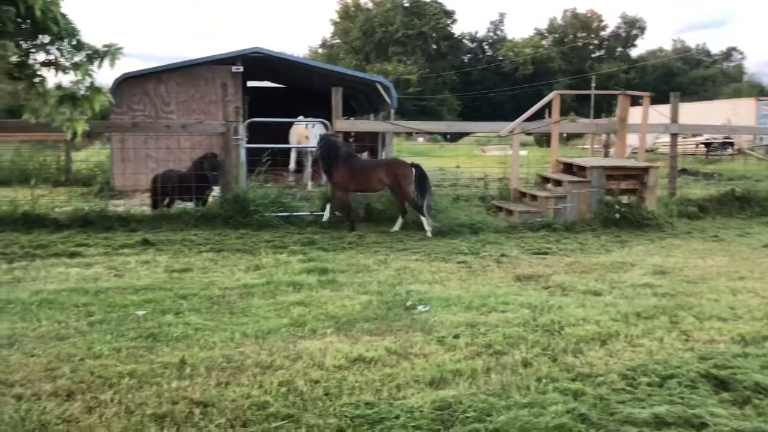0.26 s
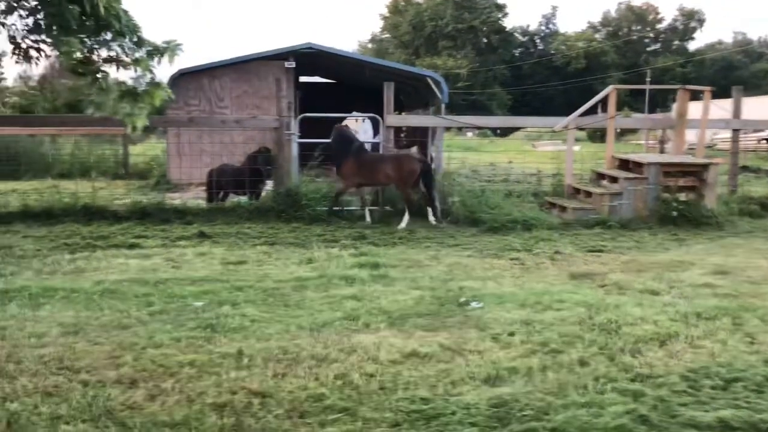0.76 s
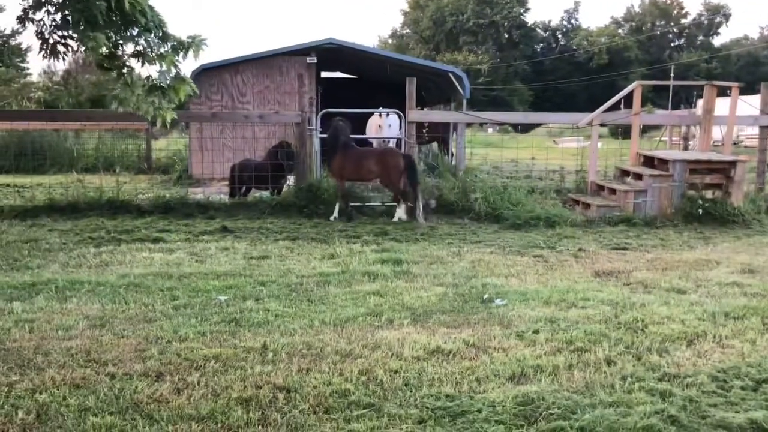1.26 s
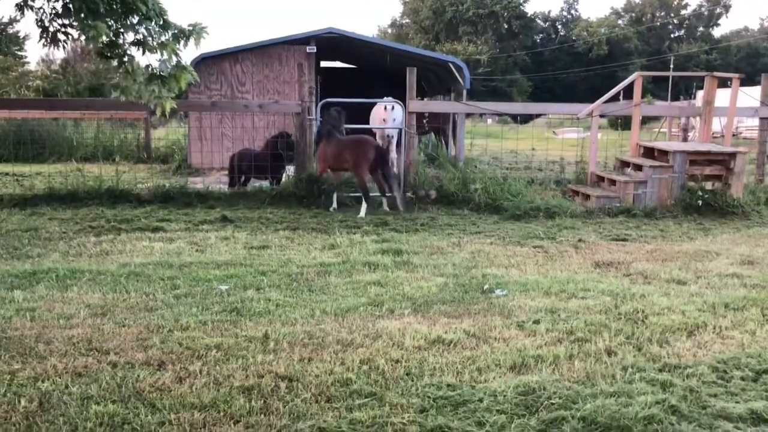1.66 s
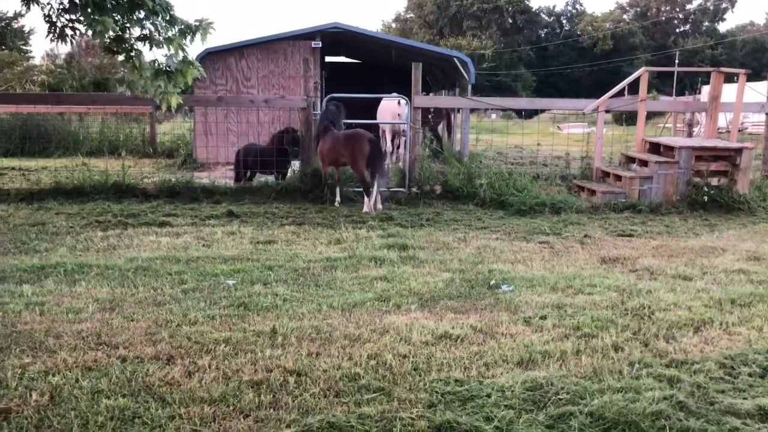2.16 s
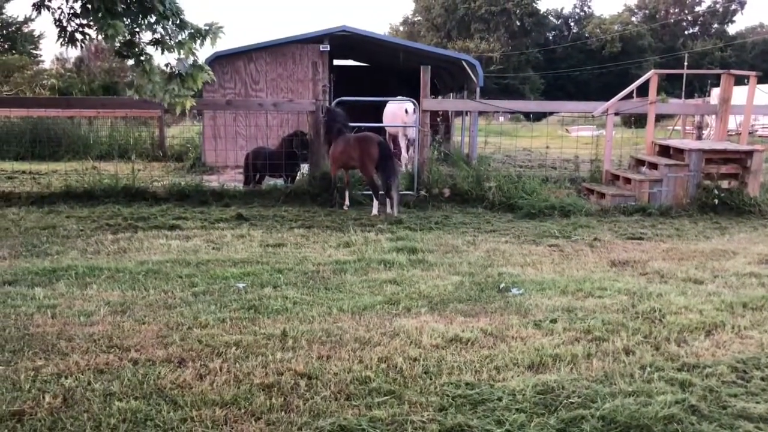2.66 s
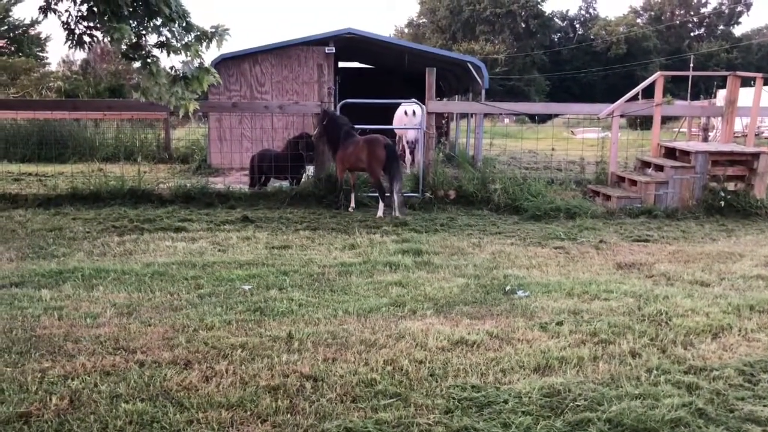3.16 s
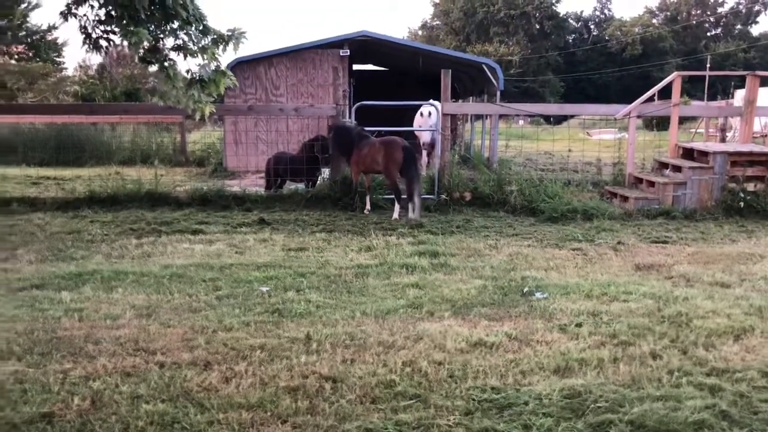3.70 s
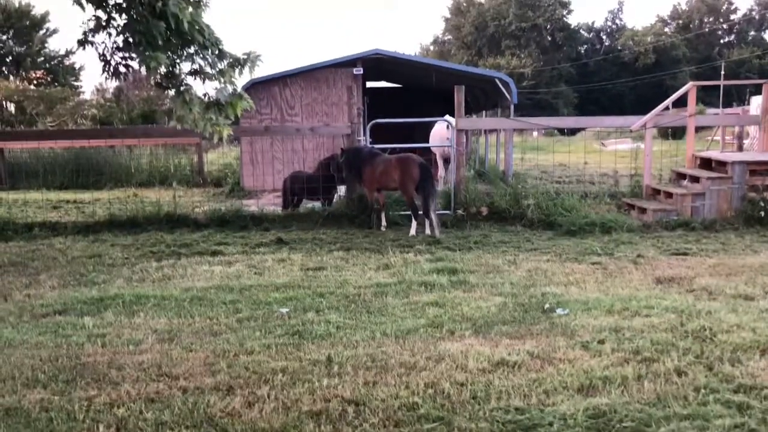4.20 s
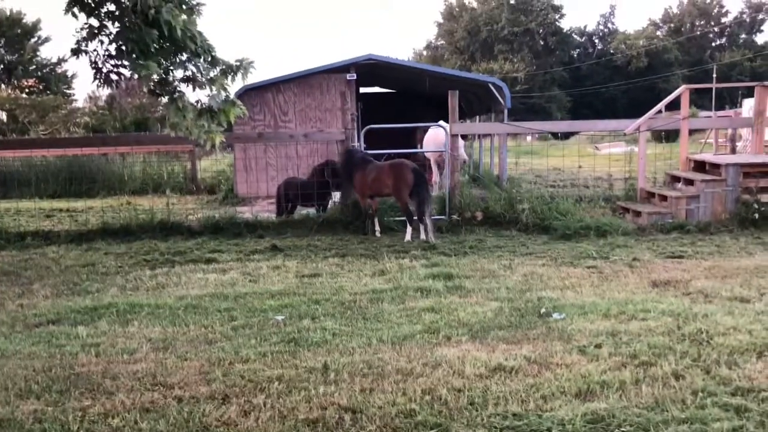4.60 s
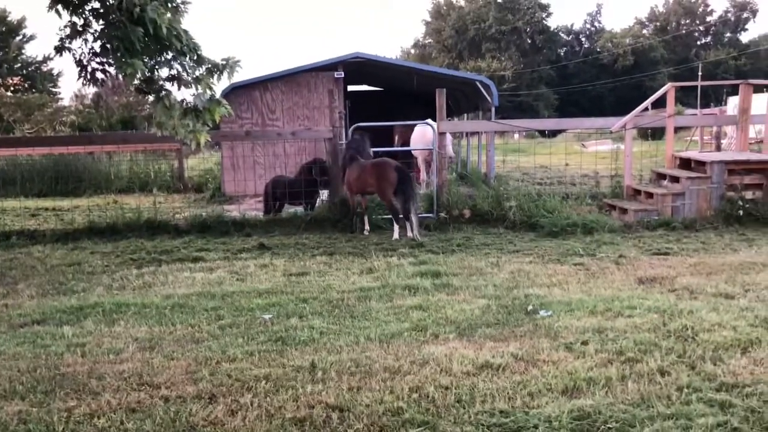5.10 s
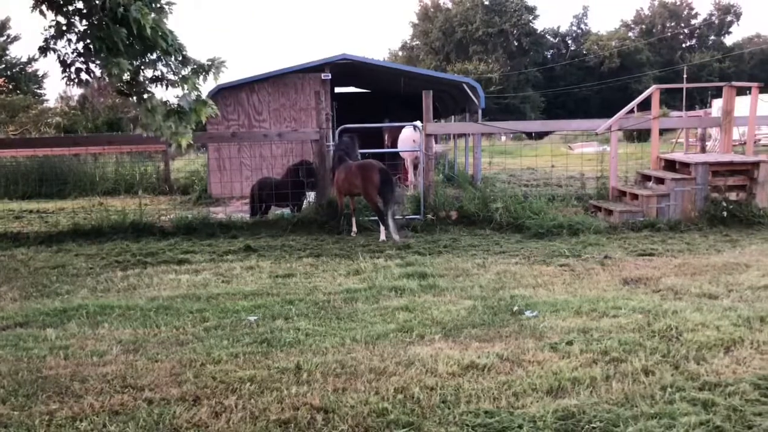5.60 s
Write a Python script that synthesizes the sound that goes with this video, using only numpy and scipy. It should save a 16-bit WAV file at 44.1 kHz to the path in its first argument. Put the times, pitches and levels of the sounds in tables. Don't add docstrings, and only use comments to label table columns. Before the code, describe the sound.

Open field insects, captured on a handheld phone in mono: high pure chirps in quick five-pulse bursts, blended with a swelling far chorus, airy rasping and a cicada wash. A faint road hums and one car passes far off. Knocks on the phone case come in the first seconds, then a single dull, hollow kick on shed boards with a short low ring, then a few small late taps.

```python
import sys
import numpy as np
from scipy import signal
from scipy.fft import rfft, irfft, next_fast_len
from scipy.io import wavfile
from scipy.ndimage import uniform_filter1d, map_coordinates

SR = 44100
rng = np.random.default_rng(int(sys.argv[2]) if len(sys.argv) > 2 else 0)


def decibels_to_gain(level_db):
    exponent = np.asarray(level_db, float) / 20
    return 10 ** exponent


def bounce(signal):
    frames = np.transpose(np.atleast_2d(signal))
    limited = np.clip(frames, -1, 1)
    pcm = np.round(limited * 32767).astype(np.int16)
    wavfile.write(sys.argv[1], SR, pcm)


N = 257984
T = np.arange(N) / SR

# time_s, strokes_count
WING_STROKES = [(0, -.3), (.3, 11.1), (.5, 19.16), (1, 40.26), (2, 81.51), (2.75, 112.01), (4.25, 172.27),
                (4.5, 181.97), (5, 202.8), (5.25, 213.09), (5.5, 222.59), (5.9, 238.6)]
# time_s, level_db
SINGING_EFFORT = [(0, -64), (.1, -58), (.2, -63), (.38, -72), (.55, -67), (.8, -60.5), (1.3, -60),
                  (2.1, -61.5), (2.7, -58.5), (3.3, -60), (4.05, -63.5), (4.58, -58.5), (4.62, -66),
                  (5.25, -62.5), (5.34, -66), (5.85, -63)]
# freq_hz, density_db
WING_COLOUR = [(9000, -45), (11700, -14), (12150, -7), (12500, -11), (13600, -10), (14300, -2), (14700, -6),
               (15300, -2), (15700, 1), (15900, -55)]
# freq_hz, density_db
GRASS_COLOUR = [(6000, -51), (7000, -2), (7400, -0.5), (7800, -2.5), (9000, -2), (11000, -3), (13000, -6.5),
                (14000, -2), (15000, 0), (15750, -5), (15900, -60)]
# freq_hz, density_db
SIZZLE_COLOUR = [(11000, -44), (13000, -8), (14200, -1), (15200, 1), (15750, -7), (15900, -60)]
# freq_hz, density_db
CICADA_COLOUR = [(1300, -32.5), (1750, -17), (2230, -6), (2500, -9.5), (2750, -3), (2990, 0.2), (3250, -3),
                 (4100, -5), (4300, -6), (5050, -2), (5900, -6), (6300, -5.5), (7000, -8), (7600, -50)]
# time_s, level_db
CICADA_SWELL = [
    (0, -52.5),
    (1.9, -52),
    (2.5, -51),
    (5.85, -52),
]
# freq_hz, density_db
RUMBLE_COLOUR = [(15, -49), (25, -35), (30, -53), (43, -7), (102, 0.5), (128, -2), (176, -5), (198, -10),
                 (223, -10), (320, -27), (420, -47), (700, -120)]
MURMUR_COLOUR = [(150, -48), (260, -3), (538, -2), (644, -4), (725, -3.5), (1000, -5.5), (1300, -8.5),
                 (2200, -120)]
TYRE_COLOUR = [(530, -10), (900, -27), (962, -11), (1130, 2), (1300, 3), (1580, 4.5), (1750, -2),
               (1850, -13), (2400, -34), (4070, -120)]
# middle_s, level_db
CHIRPS = [(.069, -42), (0.369, -42), (0.672, -42.5), (.975, -42.5), (1.28, -41), (1.588, -43), (1.918, -41),
          (2.218, -39), (2.513, -41.5), (2.816, -41.5), (3.112, -43), (3.409, -43), (3.698, -39.5),
          (4.038, -41), (4.335, -41.5), (4.649, -40.5), (4.963, -40.5), (5.254, -49), (5.54, -40),
          (5.838, -41)]
CHIRP_PULSES = [6] + [5] * 19
# middle_s, top_level_db
CHORUS_SWELLS = [(.09, -48.5), (.394, -46.5), (.708, -48.5), (.998, -46.5), (1.299, -47.5), (1.6, -46.5),
                 (1.908, -47), (2.211, -48.5), (2.503, -47), (2.813, -47.5), (3.118, -45), (3.423, -47.5),
                 (3.728, -46), (4.024, -47), (4.311, -46), (4.618, -46), (4.935, -46.5), (5.235, -49),
                 (5.532, -46.5), (5.84, -47.5)]
# freq_hz, density_db
SCRAPE_COLOUR = [(6000, -26), (6350, -26), (7100, 0), (7450, -5.5), (7800, -22)]
# start_s, case_db, bright_crack_db
TAPS = [(.139, -46, -36), (0.572, -28.5, -37), (.588, -43, -33), (1.094, -40, -60), (1.187, -32, -31),
        (1.2195, -33, -47), (1.223, -38, -45), (1.235, -39, -46), (2.037, -41, -45), (5.1118, -36, -52),
        (5.286, -33.5, -33), (5.297, -37, -45), (5.4628, -39, -49), (5.6442, -45, -51), (5.8187, -43, -47)]
# centre_hz, width_hz, level_db
CASE_MODES = [(950, 190, 2), (2000, 360, 3.5), (3150, 1200, -4), (4430, 1000, -1.5), (6900, 1800, -3)]
# middle_s, pitch_hz, level_db
TRILLS = [(.38, 4100, -68), (.65, 4090, -61), (0.641, 4489, -67), (1.531, 4112, -64), (1.53, 4460, -63),
          (2.21, 4059, -63), (2.38, 4470, -70), (2.68, 3930, -61), (3.08, 4059, -65), (3.29, 4521, -68),
          (3.56, 3970, -61), (4.32, 4380, -63), (4.4, 3983, -67), (4.9, 4069, -67), (5.13, 4198, -64),
          (5.47, 4000, -66), (5.74, 4489, -64)]
# start_s, peak_db, first_hz, last_hz, t60_s
THUMPS = [
    (0.4827, -40.5, 350, 200, 0.014),
    (0.574, -27.5, 326, 89, 0.027),
    (0.59, -35, 294, 150, 0.027),
    (1.189, -26.5, 340, 102, 0.033),
    (3.397, -23, 323, 133, 0.049),
    (3.412, -30, 414, 250, 0.033),
    (3.451, -37, 200, 120, 0.037),
    (5.2893, -29.5, 564, 70, 0.0088),
]
# start_s, length_s, peak_db, first_hz, last_hz
SQUEAKS = [
    (0.53, 0.023, -44.5, 393, 624),
    (1.127, 0.019, -54.5, 624, 614),
    (1.144, 0.0256, -49, 354, 676),
]
# start_s, level_db, pitch_hz, t60_s
RINGS = [(0.572, -34.5, 3800, 0.0068), (0.5734, -37, 950, 0.0062), (.573, -44, 1950, .007),
         (0.5767, -40, 2820, 0.0087), (0.58, -45, 2620, .012), (1.094, -48.5, 2000, .02),
         (1.187, -32.5, 990, 0.0093), (1.187, -41, 2290, 0.0087), (1.221, -46, 780, 0.018),
         (1.186, -41, 3400, 0.011), (1.188, -44, 4500, .008), (1.396, -52, 570, 0.045),
         (5.1123, -46.5, 1830, 0.027), (5.288, -49, 840, 0.0091), (5.4623, -45, 2330, .011),
         (5.6435, -42.5, 2400, 0.013), (5.8193, -41, 2150, .016)]
# pitch_hz, level_db, t60_s
WALL_MODES = [(110.8, -36.5, 0.88), (197, -44, 0.77), (292.5, -48, 0.35)]
# from_hz, to_hz, under_db
MASKED_BANDS = [(7240, 7580, -28), (7580, 7920, -27), (7920, 8270, -27.3), (8270, 8610, -30.5),
                (8610, 8960, -32)]


def unit(x):
    return x / np.sqrt(np.mean(x ** 2) + 1e-20)


def curves(rows):
    s, *cols = np.transpose(rows)
    return [np.interp(T, s, c) for c in cols]


def wobble(rate, size=1):
    coarse = T[::64]
    knots = rng.standard_normal((size, int(N * rate / SR) + 4))
    return np.squeeze([np.interp(T, coarse, map_coordinates(row, [coarse * rate])) for row in knots])


def rush(spectrum, patchy_db, size=N):
    z = signal.stft(rng.standard_normal(size + 512), SR, nperseg=512)[2]
    field = uniform_filter1d(rng.standard_normal(z.shape), 5, 0)
    field = uniform_filter1d(field, 10, 1)
    x = signal.istft(z * decibels_to_gain(patchy_db * unit(field)), nperseg=512)[1]
    f, db = np.transpose(spectrum)
    m = next_fast_len(len(x))
    hz = np.fft.rfftfreq(m, 1 / SR)
    colour = decibels_to_gain(np.interp(np.log(hz + 1), np.log(f + 1), db))
    return unit(irfft(rfft(x, m) * colour, m)[:size])


def tone(hz):
    return np.sin(2 * np.pi * np.cumsum(hz) / SR)


def add(out, s, sound):
    part = out[max(round(s * SR), 0):][:len(sound)]
    part += sound[:len(part)]


def field_echo(x, t60, wet_db):
    t = np.arange(SR // 3) / SR
    tail = rng.standard_normal(len(t)) * decibels_to_gain(-60 * t / t60) * np.clip(t / 0.0048, 0, 1)
    return x + decibels_to_gain(wet_db) * signal.fftconvolve(x, tail / np.linalg.norm(tail))[:N]


def shimmer(x, depth_db):
    z = signal.stft(x, nperseg=4096)[2]
    patches = uniform_filter1d(rng.standard_normal(z.shape), size=4, axis=1)
    field = decibels_to_gain(depth_db * unit(patches))
    return signal.istft(z * unit(field), nperseg=4096)[1][:N]


def bush_crickets():
    join_s, tire_s, leave_s = 2.02, 3.7, 4.6
    second_db, tire_db = -61, -15
    hiss_db, hiss_follows = -63, 0.53
    in_step_share, blur = 0.61, 0.33
    sizzle_db = -60

    rasp_db, = curves(SINGING_EFFORT)
    duet = np.clip((T - join_s) / (leave_s - join_s), 0, 1)
    tired = np.clip((T - tire_s) / (leave_s - tire_s), 0, 1)
    second = (duet > 0) * (duet < 1) * decibels_to_gain(second_db + tire_db * tired)
    first = decibels_to_gain(hiss_db + hiss_follows * (rasp_db - np.median(rasp_db)))
    hiss = np.hypot(first, second)

    in_step = in_step_share - blur * np.sin(np.pi * duet) ** 2
    strokes, = curves(WING_STROKES)
    throb = ((1 + np.cos(2 * np.pi * strokes)) / 2) ** 0.8
    throb = 1 + np.clip(in_step, 0, 1) * (throb / throb.mean() - 1)
    rasp = decibels_to_gain(rasp_db) * unit(throb * rush(WING_COLOUR, patchy_db=1.1))
    sizzle = decibels_to_gain(sizzle_db) * np.sin(np.pi * duet ** 1.3) ** 0.8 * rush(SIZZLE_COLOUR, patchy_db=0.0)
    return sizzle + rasp + hiss * unit(throb + 5.5) * rush(GRASS_COLOUR, patchy_db=1.5)


def far_cicadas():
    swell_db, = curves(CICADA_SWELL)
    return decibels_to_gain(swell_db + 0.31 * wobble(8.6)) * rush(CICADA_COLOUR, patchy_db=0.74)


def far_road():
    pass_s, pass_db, half_power_s = 3.24, -60, 0.65
    traffic_db, rumble_db, murmur_db = -71.5, -56, -65
    car = decibels_to_gain(pass_db) / np.hypot(1, (T - pass_s) / half_power_s)
    tyres = np.hypot(car, decibels_to_gain(traffic_db))
    rumble = decibels_to_gain(rumble_db + 0.57 * wobble(2.9)) * rush(RUMBLE_COLOUR, patchy_db=0.5)
    murmur = np.hypot(decibels_to_gain(murmur_db), 0.5 * tyres) * rush(MURMUR_COLOUR, patchy_db=0.96)
    return rumble + murmur + tyres * rush(TYRE_COLOUR, patchy_db=1.5)


def near_cricket():
    pitch_hz, sag_hz, gap_s, length_s = 6950, 60, 0.0275, 0.017
    out = np.zeros(N)
    u = np.arange(round(length_s * SR)) / (length_s * SR)
    shape = np.sin(np.pi * u ** 1.05) ** 0.9
    for (s, db), count in zip(CHIRPS, CHIRP_PULSES):
        for k, (size, tune, late) in enumerate(rng.standard_normal((count, 3))):
            stroke = tone(pitch_hz + 10 * tune - sag_hz * u)
            start = s + (k - (count - 1) / 2) * gap_s - length_s / 2
            start += 0.00073 * late + 0.0026 * (k == 0)
            add(out, start, decibels_to_gain(db - 4.5 + 1.8 * size) * shape * stroke)
    return field_echo(out, t60=0.14, wet_db=-7)


def cricket_chorus():
    count, rest_db = 15, -66
    rise_s, fall_s, squareness = 0.12, 0.12, 2.15
    levels = []
    for s, db in CHORUS_SWELLS:
        away = np.where(T < s, (s - T) / rise_s, (T - s) / fall_s)
        levels.append(db - 12 * away ** squareness)
    level_db = np.max(levels, axis=0)

    group_hz = 6640 + 90 * wobble(8.2)
    out = np.zeros(N)
    for k, (shift, pace, start) in enumerate(rng.random((count, 3))):
        drift, size = wobble(5, size=2)
        hz = 6490 + 350 * (k + shift) / count + 35 * drift
        stroke_hz = 34 + 4 * pace
        strokes = np.clip(np.sin(2 * np.pi * (stroke_hz * T + start)) + 0.21, 0, 1)
        nearness = decibels_to_gain(2.6 * size - 3.5 * np.abs(hz - group_hz) / 150)
        out += nearness * strokes * tone(hz + 30 * wobble(60))
    out = field_echo(out, t60=0.15, wet_db=-4)
    even = out / np.sqrt(np.abs(uniform_filter1d(out ** 2, SR // 12)) + 1e-9)
    scrape = decibels_to_gain(level_db - 17.0) * rush(SCRAPE_COLOUR, patchy_db=4.5)
    return even * np.hypot(decibels_to_gain(level_db), decibels_to_gain(rest_db)) + scrape


def case_taps():
    out, jolts, t = np.zeros(N), np.zeros(N), np.arange(SR // 8) / SR
    envelope = decibels_to_gain(-60 * t / 0.012) * (1 - np.exp(-t / 0.0019))
    for s, case_db, crack_db in TAPS:
        grit = rng.standard_normal((2, len(t))) * envelope
        add(out, s, decibels_to_gain(crack_db - 1.0) * np.gradient(grit[0]))
        add(jolts, s, decibels_to_gain(case_db + 9.0) * grit[1])
        add(jolts, s + 0.00121, decibels_to_gain([case_db + 14]))
    m = next_fast_len(N)
    f = np.fft.rfftfreq(m, 1 / SR)
    case = 0
    for k, (centre, width, db) in enumerate(CASE_MODES):
        damping = 1j * f * width
        case = case + (-1) ** k * decibels_to_gain(db) * damping / (centre * centre - f * f + damping)
    return out + irfft(rfft(jolts, m) * case, m)[:N]


def tree_crickets():
    length_s = 0.17
    out = np.zeros(N)
    u = np.arange(round(length_s * SR)) / (length_s * SR)
    for s, hz, db in TRILLS:
        whistle = np.sin(np.pi * u) * np.sin(2 * np.pi * hz * length_s * u)
        add(out, s - length_s / 2, decibels_to_gain(db + 3) * whistle)
    return out


def thumps():
    out, t = np.zeros(N), np.arange(SR // 8) / SR
    for s, db, first_hz, last_hz, t60 in THUMPS:
        hz = last_hz + (first_hz - last_hz) * np.exp(-t / 0.0054)
        rise_s = min(0.13 * t60, 0.0068)
        add(out, s, decibels_to_gain(db - 60 * t / t60) * (1 - np.exp(-t / rise_s)) * 2 * tone(hz))
    return out


def skin_squeaks():
    out = np.zeros(N)
    for s, length, db, first_hz, last_hz in SQUEAKS:
        u = np.arange(round(length * SR)) / (length * SR)
        hz = first_hz + (last_hz - first_hz) * u ** 0.92
        level = decibels_to_gain(db + 2.6 * wobble(236)[:len(u)])
        add(out, s, level * np.sin(np.pi * u) ** 0.13 * tone(hz))
    return out


def loose_parts():
    out, t = np.zeros(N), np.arange(SR // 8) / SR
    for s, db, hz, t60 in RINGS:
        envelope = decibels_to_gain(db - 60 * t / t60) * (1 - np.exp(-t / 0.00014))
        add(out, s, envelope * 2 * np.sin(2 * np.pi * hz * t))
    return out


def shed_wall():
    kick_s, rattle_db = 3.399, -41.5
    low_colour = [(70, -42), (100, -4.0), (220, -4.5), (340, -2.0), (420, -44)]  # freq_hz, density_db
    high_colour = [(150, -40), (230, 1.0), (420, 0), (480, -4.0), (560, -42)]
    out, t = np.zeros(N), np.arange(SR) / SR
    ring = np.zeros(SR)
    for hz, db, t60 in WALL_MODES:
        ring += decibels_to_gain(db - 60 * t / t60) * np.sin(2 * np.pi * (hz * t + rng.random()))
    low = decibels_to_gain(rattle_db - 1 - 60 * t / 0.51) * rush(low_colour, patchy_db=-5.5, size=SR)
    high = decibels_to_gain(rattle_db - 2.0 - 60 * t / 0.21) * rush(high_colour, patchy_db=1.0, size=SR)
    build_up = 1 - np.exp(-(t / 0.04) ** 2)
    add(out, kick_s, ring * build_up + (low + high) * (1 - np.exp(-t / 0.012)))
    return out


def scene():
    far = shimmer(bush_crickets() + far_cicadas() + far_road(), depth_db=2.5) + tree_crickets()
    crickets = near_cricket() + cricket_chorus()
    handling = case_taps() + thumps() + skin_squeaks() + loose_parts()
    mono = far + crickets + handling + shed_wall()
    return np.array([mono, mono])


def top_cut(x):
    return signal.sosfilt(signal.butter(12, 17030, fs=SR, output="sos"), x)


def record(dry):
    top_hz = 15730
    hz, _, z = signal.stft(dry[0], SR, nperseg=2048)

    def power(lo, hi):
        return np.mean(np.abs(z[(hz >= lo) & (hz < hi)]) ** 2, axis=0)

    chirp = power(6400, 7050)
    keep = np.ones(z.shape) * (hz < top_hz)[:, None]
    for lo, hi, under_db in MASKED_BANDS:
        keep[(hz >= lo) & (hz < hi)] = power(lo, hi) > chirp * decibels_to_gain(2 * under_db)
    mono = signal.istft(z * keep, SR, nperseg=2048)[1][:N]
    return top_cut(np.array([mono, mono]))


dry = scene()
out = record(dry)
bounce(out)
```